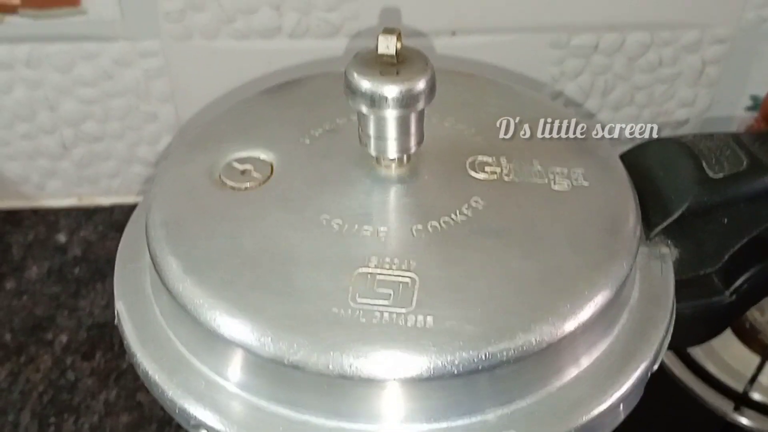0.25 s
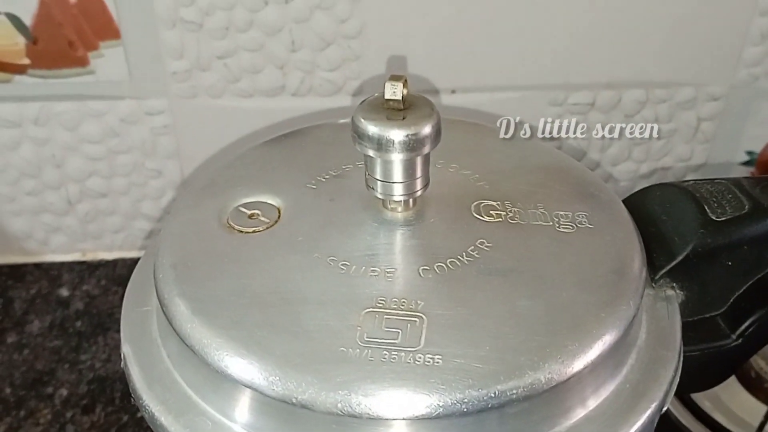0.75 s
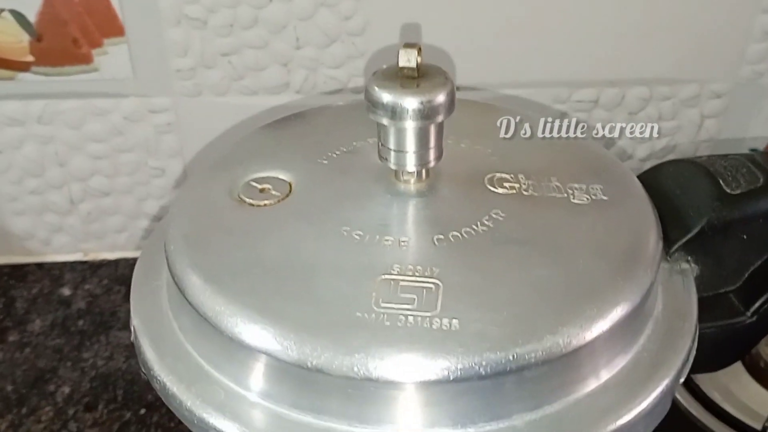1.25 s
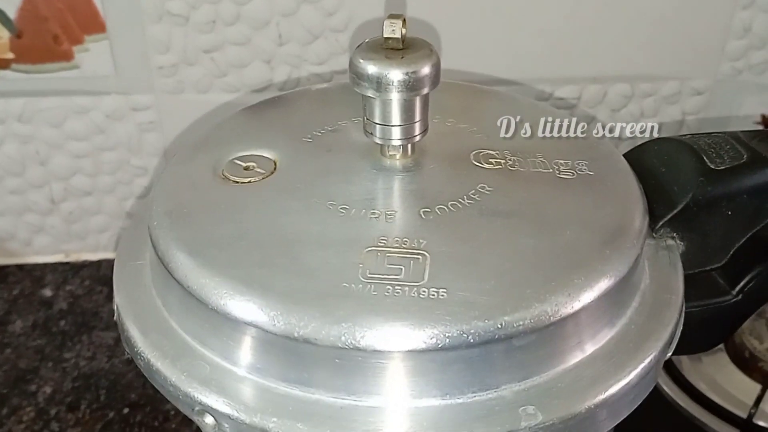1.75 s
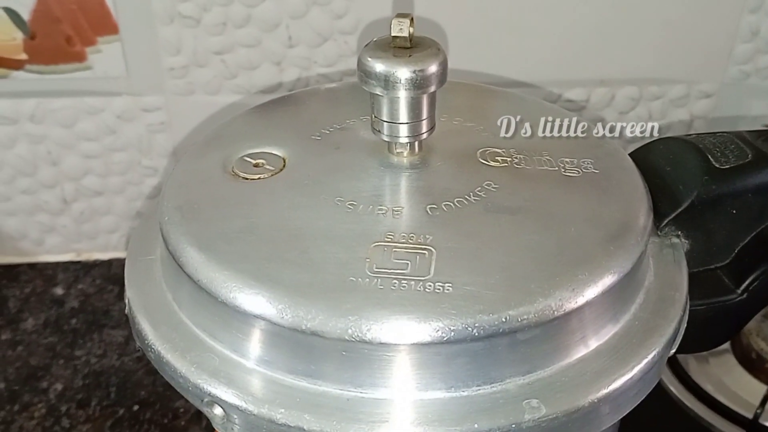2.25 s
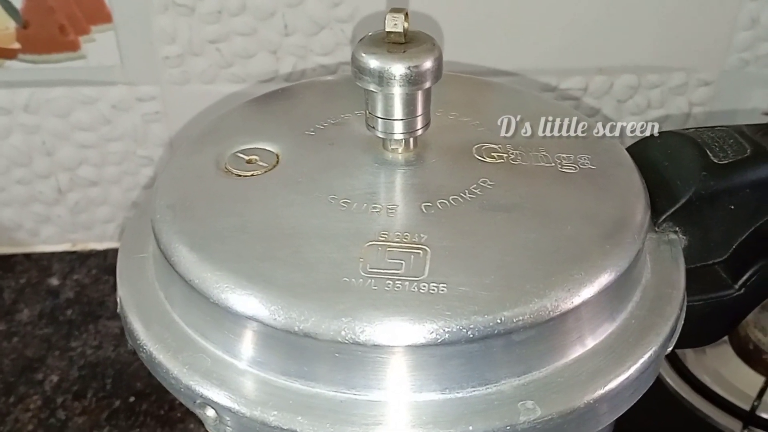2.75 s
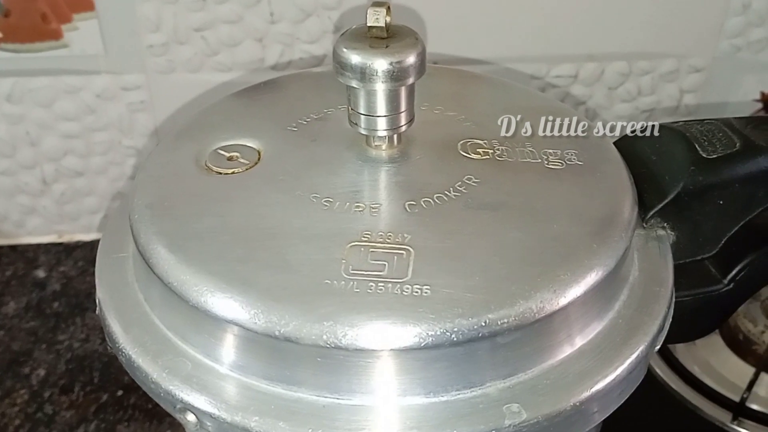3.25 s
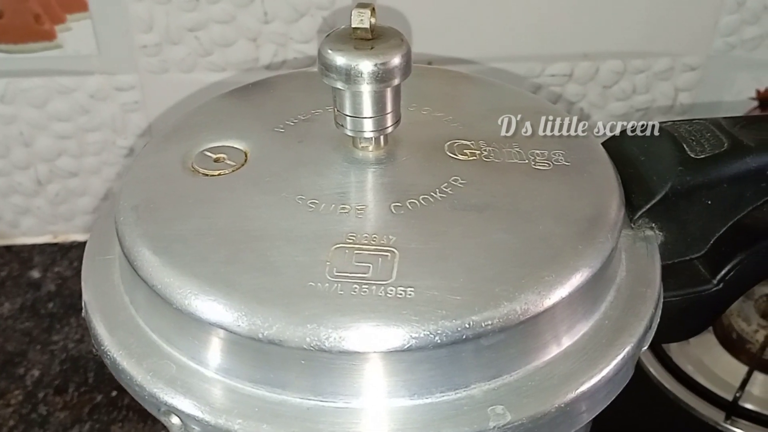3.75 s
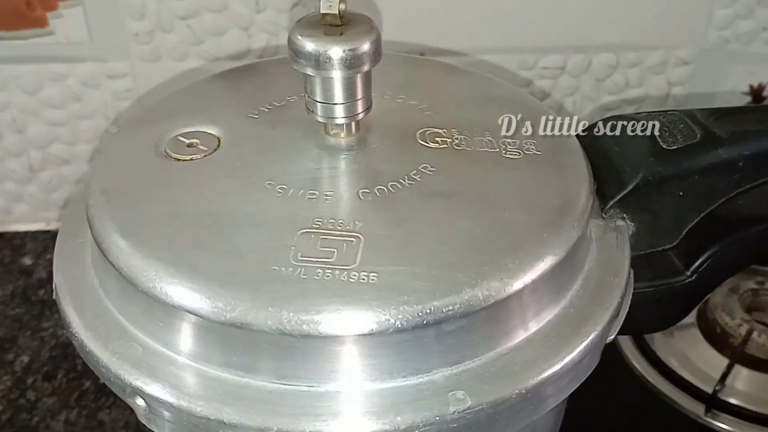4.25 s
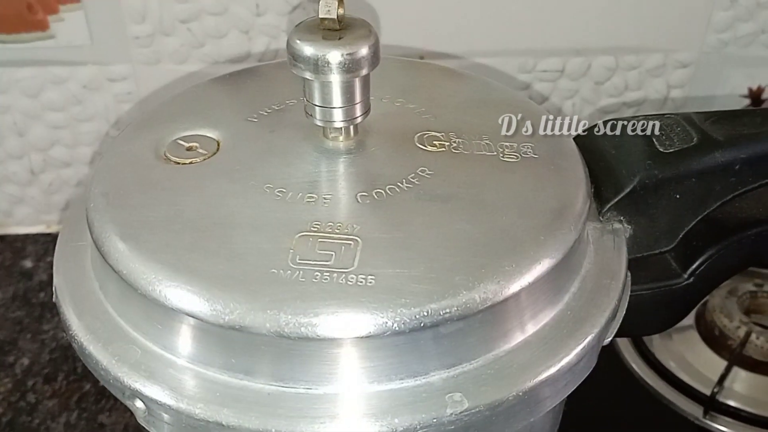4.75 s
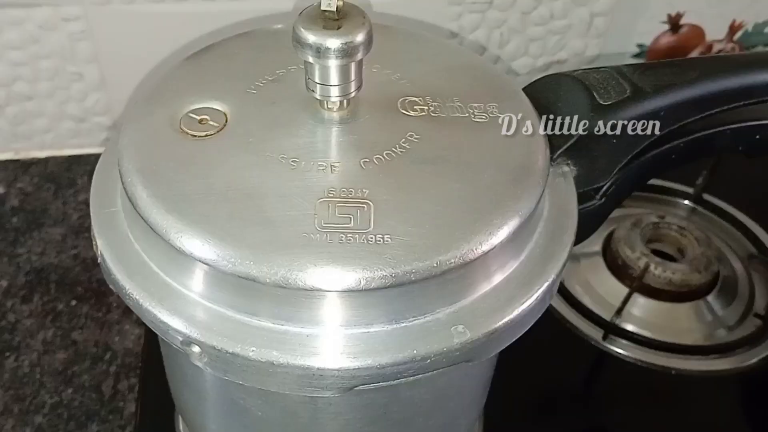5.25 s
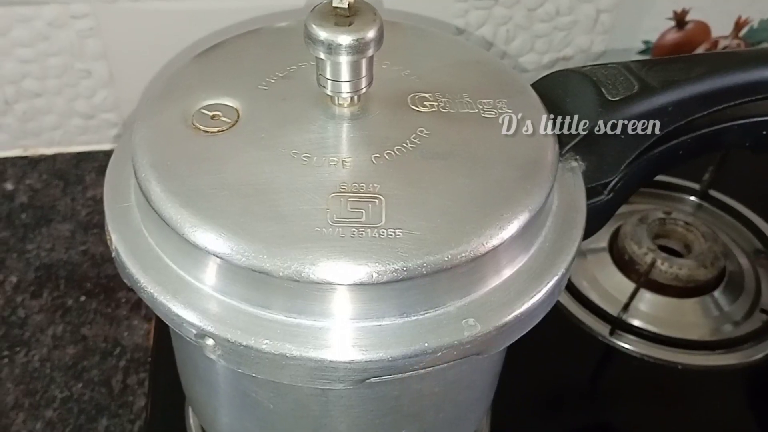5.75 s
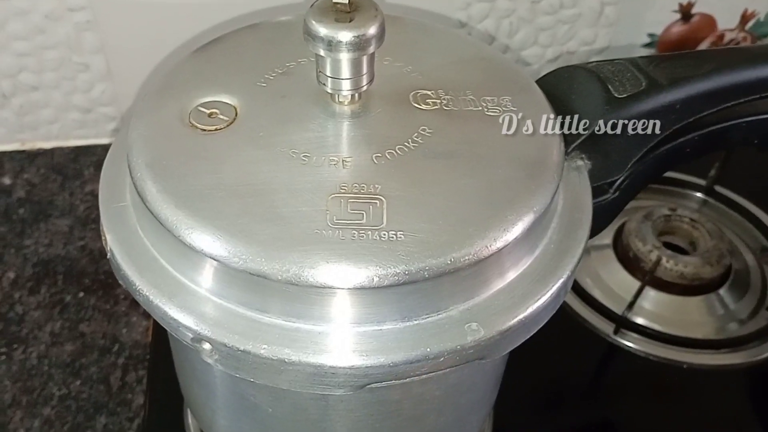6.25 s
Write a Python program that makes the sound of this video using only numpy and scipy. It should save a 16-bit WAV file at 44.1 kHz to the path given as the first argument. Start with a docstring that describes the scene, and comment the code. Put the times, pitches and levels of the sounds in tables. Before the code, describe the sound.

Popcorn bursts irregularly inside a closed metal pressure cooker with sharp cracks, ringing clangs and kernel ticks over a low burner, then briefly cuts out.

```python
"""Popcorn bursts in a closed aluminium pressure cooker: each pop is a noise crack, a ring of the metal
and a low boom of beating modes. Flung kernels tick on lid and wall; rustle and sizzle swell and fade.
Filtered noise makes the gas flame and oil; knocks, bumps, snaps and pings fall among the pops.
The sound drops out, returns faintly, then a little below its old level with a pop's hiss and pot ring;
one last hard knock, with two faint ones after it, falls over the quieter burner."""
import sys
import numpy as np
from scipy import signal
from scipy.fft import rfft, irfft
from scipy.io import wavfile
from scipy.ndimage import uniform_filter1d

SR = 44100
rng = np.random.default_rng(int(sys.argv[2]) if len(sys.argv) > 2 else 0)


def put_to_file(sound):
    """Save the sound as 16-bit audio at rate SR, in the file named by the first command-line argument."""
    columns = np.atleast_2d(sound).T  # one column per channel
    safe = np.clip(columns, -1, 1)
    whole_steps = np.round(safe * 32767)
    wavfile.write(sys.argv[1], SR, whole_steps.astype(np.int16))


N = 286727
RING_SIZE = 24576  # samples kept of each hit
T = np.arange(RING_SIZE) / SR  # seconds
F = np.arange(RING_SIZE // 2 + 1) * SR / RING_SIZE  # Hz
TOP_HZ = 15600
# moments when the sound shuts off, comes back faintly, then nearly fully
MUTE_S, FAINT_S, BACK_S = 5.171, 5.257, 5.311
SWITCH_S = 0.011


def undb(db):
    """Decibels to gain."""
    return 10 ** (np.asarray(db) / 20)


def ramp(start, length):
    """Straight rise from 0 to 1; both times in seconds."""
    return np.clip((np.arange(N) / SR - start) / length, 0, 1)


def response(points):
    """Causal (minimum-phase) frequency response through (frequency [Hz], level [dB]) points."""
    hz, db = np.transpose(points)
    level_db = np.interp(np.log(np.maximum(F, 1)), np.log(hz), db)
    cepstrum = irfft(np.log(undb(level_db)))
    # folding the cepstrum onto positive time makes the response causal
    cepstrum[1:RING_SIZE // 2] *= 2
    cepstrum[RING_SIZE // 2 + 1:] = 0
    return np.exp(rfft(cepstrum))


def fade(t60):
    """Exponential decay that falls 60 dB in t60 seconds."""
    return undb(-60 * T / t60)


def pair(size, apart_db):
    """Stereo noise: a common part, and an opposite part at apart_db relative to it."""
    mid, side = rng.standard_normal((2, size))
    side = side * undb(apart_db)
    return np.array([mid + side, mid - side]) / np.hypot(1, undb(apart_db))


def pan(right_db):
    """Gains that put the right channel right_db above the left."""
    return undb(np.array([[-right_db], [right_db]]) / 2)


def unit(x):
    """Scale a hit to rms 1 over its first hundredth of a second."""
    return x / np.sqrt(np.mean(x[..., :SR // 100] ** 2))


def add(out, s, x):
    """Mix a hit in at its time in seconds."""
    i = max(int(s * SR), 0)
    out[:, i:i + RING_SIZE] += x[..., :N - i]


RATTLE_DB = 2.5  # how unevenly the tail of a hit dies away


def rattle():
    """Gain that flickers from one moment to the next, as small rebounds crowd a hit's tail."""
    k = SR // 400  # samples per flicker step
    steps = np.repeat(rng.standard_normal(RING_SIZE // k + 1), k)
    flicker = uniform_filter1d(steps, k // 3)[:RING_SIZE]
    gain = undb(RATTLE_DB * flicker)
    return gain / np.sqrt(np.mean(gain ** 2))


def burst(colour, t60, tail_db, tail_t60, apart_db):
    """One hit through a body: contact spike, fast direct decay, then a diffuse tail from pot and tiles."""
    direct = pair(RING_SIZE, apart_db) * (fade(t60) + fade(t60 / 6))
    tail = pair(RING_SIZE, -1.2) * fade(tail_t60) * undb(tail_db) * rattle()
    hit = np.roll(irfft(rfft(direct + tail) * colour), 24, axis=1)
    # the last tenth of a second closes to silence
    return unit(hit * np.minimum(1, 10 * (T[-1] - T)))


def modes(table):
    """One decaying sine a row of (frequency [Hz], level [dB], t60 [s])."""
    return np.array([undb(db) * np.sin(2 * np.pi * hz * T) * fade(t60) for hz, db, t60 in table])


def steady(source, points):
    """Colour a long source and bring it to rms 1."""
    x = signal.fftconvolve(source, irfft(response(points))[None], axes=1)[:, :N]
    return x / x.std()


def walk(rate):
    """Slow random wander with spread 1, heading for a new value rate times a second."""
    k = int(SR / rate)
    x = uniform_filter1d(np.repeat(rng.standard_normal(N // k + 1), k), k)[:N]
    return x / x.std()


# resonances of lid and wall: (frequency [Hz], width [Hz], level above the dense modes [dB])
METAL_RESONANCES = [(1455, 29.4, 23), (1521, 24, 18.5), (2070, 36.6, 17.5), (2466, 33, 12.5),
                    (2812, 24, 11), (3640, 14, 0), (4284, 40, 2.5), (4445, 80, 0.5), (5500, 89, 0),
                    (7120, 330, -2), (7600, 120, -6), (8130, 79, 6), (8470, 110, 3), (9210, 60, 0),
                    (10150, 19, 2)]


def shell(ripple_db, turn):
    """Metal: strong resonances over rippling dense modes, each with its own phase at the two microphones."""
    peaks = 1 + sum(undb(db) / (1 + 2j * (F - hz) / width) for hz, width, db in METAL_RESONANCES)
    grid = np.linspace(3000, TOP_HZ, 260)
    ripple_levels = ripple_db * rng.standard_normal(len(grid)) * (grid > grid[0])
    ripple = response(np.column_stack([grid, ripple_levels]))
    # phase wanders in radians above the lowest resonance, opposite ways in the two channels
    phase = np.cumsum(turn * rng.standard_normal(len(F)) * (F > METAL_RESONANCES[0][0]))
    return peaks * ripple * np.exp(1j * phase * np.array([[1], [-1]]))


# swells of rustle and sizzle; the last is a hissing tail of a pop as the sound returns:
# (time [s], rustle level [dB], sizzle level [dB], t60 [s])
SWELLS = [(-.03, -44, -44, 0.62), (.94, -39.5, -43, 0.92), (1.23, -47, -51, 1.33), (1.5, -51, -54.5, 0.74),
          (5.315, -57, -45, 0.58)]
SWELL_RISE_S = .03


def swells():
    """Gains of rustle and sizzle: each swell rises quickly and dies away."""
    gains = np.zeros((2, N))
    for s, rustle_db, sizzle_db, t60 in SWELLS:
        age = np.maximum(np.arange(N) / SR - s - SWELL_RISE_S, 0)
        swell = ramp(s, SWELL_RISE_S) * np.exp(-np.log(1000) * age / t60)
        gains += undb([[rustle_db], [sizzle_db]]) * swell
    return gains


# tone of the dry rustle: (frequency [Hz], level [dB])
RUSTLE_TONE = [(250, -12), (700, 2), (1200, -5), (1550, 4), (3000, -5.5), (4600, -5.5), (6000, -11.5),
               (12000, -16)]
# tone of the struck metal, also used for the hits: (frequency [Hz], level [dB])
CLANG_TONE = [(400, -4.5), (1000, -14.5), (1250, -14.5), (1600, 0), (2300, -1.5), (2750, -0.5), (3080, -14),
              (3550, 3.5), (3950, -6.5), (4400, 0), (5000, -15), (8000, -31.5)]
GRAINS_PER_S, GRAIN_SPREAD_DB = 700, 3
RUSTLE_RING_DB = -4.5  # the metal's ring, relative to the dry rustle


def shuffle(metal):
    """Loose kernels touch each other and the pot: a dry rustle, and sparser touches that ring the metal."""
    chosen = rng.random(N) < GRAINS_PER_S / SR
    touches = chosen * undb(GRAIN_SPREAD_DB * rng.standard_normal(N)) * pair(N, -0.32)
    on_metal = touches * (rng.random(N) < .25)
    ringing = signal.fftconvolve(on_metal, irfft(metal), axes=1)[:, :N]
    dry_rustle = steady(touches, RUSTLE_TONE)
    return (dry_rustle + undb(RUSTLE_RING_DB) * steady(ringing, CLANG_TONE)) * pan(2.8)


# tone of the gas flame: (frequency [Hz], level [dB])
FLAME_TONE = [(25, -25.5), (55, -4.5), (95, -3), (170, 1), (240, -7.5), (330, -2.5), (480, -10),
              (800, -22.5), (1500, -29.5), (4000, -45.5)]
# tone of the oil: (frequency [Hz], level [dB])
SIZZLE_TONE = [(700, -12), (1500, 4), (3000, 0.5), (5000, -0.5), (7000, 0), (8600, 4.5), (10300, 4.5),
               (12000, -4.5), (16000, -12.5)]
# burner levels while the corn pops, and late, ahead of the dropout's own gain
FLAME_DB, SIZZLE_DB = -46.5, -56.5
LATE_FLAME_DB, LATE_SIZZLE_DB, HUM_DB, HUM_HZ = -49, -61, -50.5, 95
# the background dips suddenly and creeps back
DIP_S, DIP_FALL_S, DIP_RECOVER_S, FLAME_DIP_DB, SIZZLE_DIP_DB = 4.46, 0.083, 0.61, -14, -2.5


def stove(metal):
    """Fluttering flame, fine sizzle and swelling rustle; quieter late on, with a faint hum."""
    late = ramp(FAINT_S, SWITCH_S)
    dip = ramp(DIP_S, DIP_FALL_S) - ramp(DIP_S + DIP_FALL_S, DIP_RECOVER_S)
    flame_gain = undb((1 - late) * FLAME_DB + late * LATE_FLAME_DB + dip * FLAME_DIP_DB)
    sizzle_gain = undb((1 - late) * SIZZLE_DB + late * LATE_SIZZLE_DB + dip * SIZZLE_DIP_DB)
    rustle_gain, hiss_gain = swells()
    # the flame flutters by 1.6 dB, nine steps a second
    flame = steady(pair(N, -5), FLAME_TONE) * undb(1.6 * walk(9)) * pan(2.5)
    hum_hz = HUM_HZ + 4 * walk(23)
    hum = late * undb(HUM_DB) * np.sin(2 * np.pi * np.cumsum(hum_hz) / SR)
    sizzle = steady(pair(N, -1.2) * undb(.8 * walk(400)), SIZZLE_TONE) * pan(1.5)
    swelling_sizzle = np.hypot(sizzle_gain, hiss_gain) * sizzle
    return flame_gain * flame + hum + swelling_sizzle + rustle_gain * shuffle(metal)


def spot(depth_db):
    """Each kernel strikes another spot, which lifts some groups of modes and weakens others."""
    grid = np.geomspace(1000, TOP_HZ, 36)
    return response(np.column_stack([grid, depth_db * rng.standard_normal(len(grid))]))


# faint stray ticks at random until the dropout
STRAYS_PER_S, STRAY_CRACK_DB, STRAY_RING_DB, STRAY_SPREAD_DB = 3, -58.5, -59.5, 0.5


def strays():
    """Rows of (time [s], crack level [dB], ring level [dB]) for faint ticks at random moments."""
    chance = rng.random((int(STRAYS_PER_S * MUTE_S), 2))
    lift_db = STRAY_SPREAD_DB * (2 * chance[:, 1] - 1)
    return list(zip(MUTE_S * chance[:, 0], STRAY_CRACK_DB + lift_db, STRAY_RING_DB + lift_db))


# kernels bursting, also played by booms():
# (time [s], crack level [dB], metal ring level [dB], pot boom level [dB])
POPS = [(0.0333, -25.5, -29, -41), (0.1572, -21, -20.5, -24.5), (0.8017, -36.5, -35.5, -49),
        (0.8172, -31.5, -33, -21.5), (0.975, -35, -33.5, -32.5), (1.266, -42, -34.5, -30),
        (1.4785, -34, -37.5, -24.5), (1.954, -40, -33, -37.5), (2.0622, -18, -26, -30),
        (2.5328, -34, -36, -32), (2.5718, -33, -28.5, -27.5), (3.1303, -37, -28, -37),
        (3.264, -26.5, -28, -29.5), (3.3406, -43, -32.5, -32), (3.9329, -48.5, -37.5, -40),
        (4.1169, -41, -39, -36.5), (4.1982, -29, -31.5, -35.5), (4.3055, -36, -39.5, -29.5),
        (4.6655, -44.5, -45.5, -39), (4.6917, -34.5, -33.5, -27), (5.0421, -35, -37.5, -43),
        (5.1215, -37, -29.5, -39.5)]
# flung kernels hitting the metal: (time [s], crack level [dB], metal ring level [dB])
TICKS = [(.832, -26.5, -39.5), (.9034, -31, -39.5), (1.0284, -30.5, -50.5), (1.0414, -41.5, -40),
         (1.1083, -37, -52.5), (1.144, -49, -49), (1.2325, -39.5, -52), (1.2835, -40, -39),
         (1.322, -45.5, -44), (1.3635, -46, -45.5), (1.5123, -42.5, -41), (1.6686, -44, -67),
         (2.5363, -19, -32.5), (2.6, -21.5, -40.5), (2.6843, -40.5, -44), (2.8746, -36.5, -48.5),
         (3.1345, -27.5, -26.5), (3.170, -39, -48), (3.2116, -36.5, -55), (3.2775, -18, -30.5),
         (3.4013, -26.5, -30.5), (3.7895, -44.5, -45.5), (3.86, -47.5, -62), (4.2008, -27, -30.5),
         (4.706, -34, -31.5), (4.955, -41, -49), (5.0008, -54, -47.5), (5.125, -27.5, -35.5)]
# tone of the bright crack: (frequency [Hz], level [dB])
CRACK_TONE = [(1500, -31), (3500, -14.5), (5000, -11.5), (6100, -5), (6850, -5.5), (7700, -5), (8300, -4.5),
              (9300, -2.5), (10200, -4.5), (11500, -11.5), (15500, -25.5)]


def metal_hits(metal):
    """Every kernel cracks and rings the same metal; each blow weighs the modes differently."""
    out = np.zeros((2, N))
    crack_colour, clang_colour = metal * response(CRACK_TONE), metal * response(CLANG_TONE)
    hits = [pop[:3] for pop in POPS] + list(TICKS) + strays()
    for s, crack_db, ring_db in hits:
        struck = spot(depth_db=2.5)
        crack = burst(crack_colour * struck, t60=0.025, tail_db=-13, tail_t60=0.3, apart_db=-1)
        clang = burst(clang_colour * struck, t60=0.05, tail_db=-13.0, tail_t60=0.35, apart_db=-7.0)
        add(out, s, undb(crack_db) * crack * pan(5.1) + undb(ring_db) * clang * pan(6.0))
    return out


# low modes of pot and lid: (frequency [Hz], level [dB], t60 [s])
POT_MODES = [(289, 3.5, 0.47), (305, 2, 0.26), (318.1, -1.5, 0.24), (331.2, 2, 0.16), (391, 1, 0.33)]
# tone of a low thud, in booms and knocks: (frequency [Hz], level [dB])
THUD_TONE = [(60, -14), (160, 0.5), (235, -2), (320, 1), (700, -42.5)]


def booms():
    """The puff of each pop swells the air in the pot; close low modes beat against each other."""
    out = np.zeros((2, N))
    puff = modes([(318.6, 0, 0.069)])[0]
    boom = unit(signal.fftconvolve(modes(POT_MODES).sum(axis=0), puff)[:RING_SIZE])
    thud_colour = response(THUD_TONE)
    for s, _, _, db in POPS:
        thud = burst(thud_colour, t60=0.095, tail_db=-17.0, tail_t60=0.49, apart_db=-13.0)
        add(out, s, undb(db) * (boom + undb(-4) * thud))
    return out * pan(2.4)


# dull knocks: (time [s], knock level [dB], bright edge level [dB], low thud level [dB],
# hardness [dB per octave])
KNOCKS = [(0.353, -44, -78, -35.5, 0), (.478, -45.5, -72, -44, 1), (0.745, -49.5, -68.5, -41.5, -1.5),
          (3.042, -36, -53, -37, -4), (3.625, -52, -57, -47, -7), (4.2373, -45, -41.5, -36, 4),
          (4.4387, -45, -49, -38, 10), (5.6585, -25.5, -23.5, -33.5, 6), (5.72, -43.5, -56, -50, 5),
          (5.766, -48.5, -66, -58, -3)]
# short-lived modes of a knock: (frequency [Hz], level [dB], t60 [s])
KNOCK_MODES = [(420, 2.5, 0.022), (548, -1.5, 0.048), (727, -6.5, 0.04), (962, -1.5, 0.025),
               (1098, -4, 0.026), (1290, -5.5, 0.023), (1453, -11, .03)]
# tone of a knock's bright edge: (frequency [Hz], level [dB])
EDGE_TONE = [(1000, -26), (2800, -0.5), (4200, -3), (5400, -17), (6900, -4), (8200, -5), (9400, 5.5),
             (11000, -6.5), (12800, -6), (16000, -7.5)]
# bumps of the hand on the phone: (time [s], frequency [Hz], level [dB])
BUMPS = [(4.243, 93.5, -27), (4.438, 91, -25.5)]


def knocks():
    """Short dull knocks that do not ring the lid, and soft bumps on the phone's case."""
    out = np.zeros((2, N))
    edge_colour, thud_colour = response(EDGE_TONE), response(THUD_TONE)
    shapes = modes(KNOCK_MODES)
    octaves = np.log2(np.array(KNOCK_MODES)[:, 0])
    for s, knock_db, edge_db, thud_db, hardness_db in KNOCKS:
        # a harder contact favours the higher modes; the tiles add a faint tail
        weights = undb(hardness_db * octaves) * rng.choice([-1, 1], len(KNOCK_MODES))
        ring = weights @ shapes
        tiles = irfft(rfft(ring) * rfft(pair(RING_SIZE, -1.3) * fade(0.16)))
        body = unit(ring + undb(-39.5) * tiles)
        edge = burst(edge_colour, t60=0.03, tail_db=-15.5, tail_t60=0.33, apart_db=1.5)
        thud = burst(thud_colour, t60=0.083, tail_db=-22.5, tail_t60=0.23, apart_db=-9.0)
        add(out, s, undb(knock_db) * body * pan(16.4))
        add(out, s, undb(edge_db) * edge * pan(6.1))
        add(out, s, undb(thud_db) * thud * pan(9.8))
    for s, hz, db in BUMPS:
        add(out, s, modes([(hz, db, .08)]) * pan(10))
    return out


# dry snaps that leave no metal ring: (time [s], level [dB])
SNAPS = [(0.477, -46.5), (0.9567, -42.5), (0.9891, -34), (1.0056, -28), (2.7650, -37.5), (3.092, -40)]
# tone of a snap: (frequency [Hz], level [dB])
SNAP_TONE = [(200, 4), (800, -4), (1300, -6.5), (2300, -2), (4000, -7.5), (6000, -6), (9000, -8.5),
             (16000, -14.5)]
# short pings of kernels and metal; the last, low and long, is the pot ringing on as the sound returns:
# (time [s], frequency [Hz], level [dB], t60 [s])
PINGS = [(0.9734, 1820, -31, 0.051), (1.2824, 4440, -35, .03), (1.364, 4750, -39.5, 0.033),
         (1.5115, 2650, -31, 0.041), (1.5748, 2080, -34.5, 0.043), (5.26, 385, -36, 0.58)]


def snaps_and_pings():
    """Dry broadband snaps of noise, and lone resonances that ring out as single decaying sines."""
    out, colour = np.zeros((2, N)), response(SNAP_TONE)
    for s, db in SNAPS:
        snap = burst(colour, t60=.02, tail_db=-25, tail_t60=.15, apart_db=-5) * pan(8)
        add(out, s, undb(db) * snap)
    for s, hz, db, t60 in PINGS:
        add(out, s, modes([(hz, db, t60)]) * pan(6.8))
    return out


# gain while shut, while faint, and from then on
MUTE_DB, FAINT_DB, BACK_DB = -54, -22.5, -4.5


def dropout():
    """Gain that shuts off briefly and reopens in two steps, staying a little lower."""
    shut, faint, back = (ramp(s, SWITCH_S) for s in (MUTE_S, FAINT_S, BACK_S))
    return undb(MUTE_DB * (shut - faint) + FAINT_DB * (faint - back) + BACK_DB * back)


def scene():
    """The cooker on its burner."""
    metal = shell(ripple_db=2, turn=.045)
    return stove(metal) + metal_hits(metal) + booms() + knocks() + snaps_and_pings()


def record(dry):
    """The phone's low cut, rounded peaks, a brief dropout and a steep top cut."""
    thinned = signal.sosfilt(signal.butter(3, 56, "highpass", fs=SR, output="sos"), dry)
    rounded = .9 * np.tanh(thinned / .9)
    top_cut = signal.ellip(8, .2, 70, TOP_HZ, fs=SR, output="sos")
    return signal.sosfilt(top_cut, rounded * dropout())


dry = scene()
out = record(dry)
put_to_file(out)
```